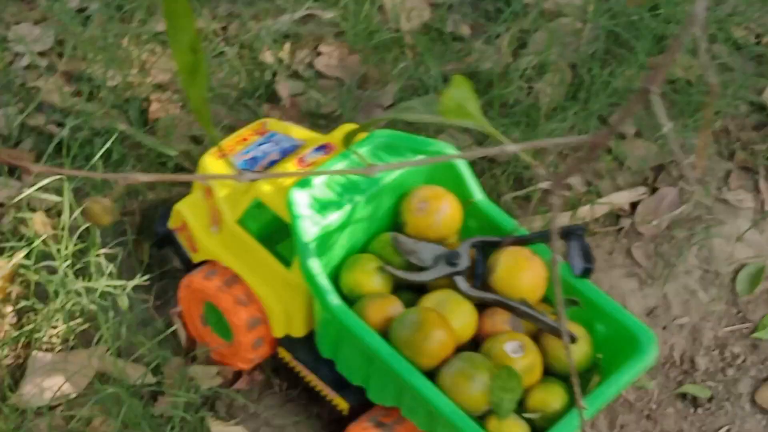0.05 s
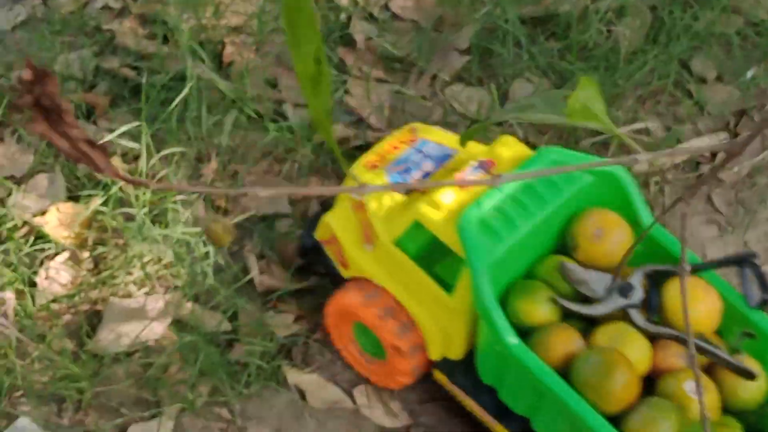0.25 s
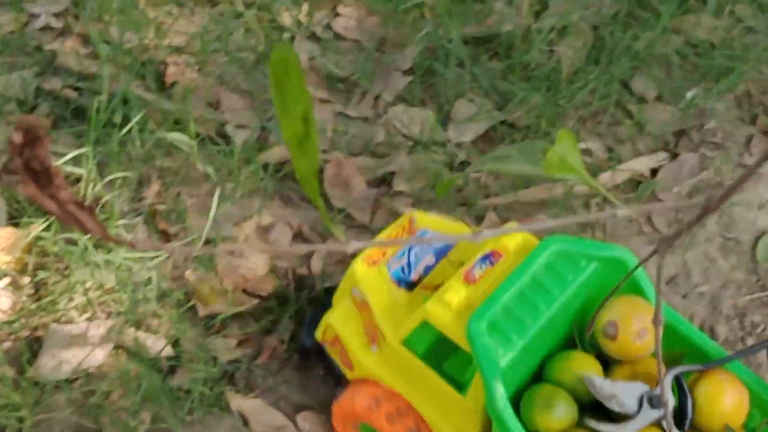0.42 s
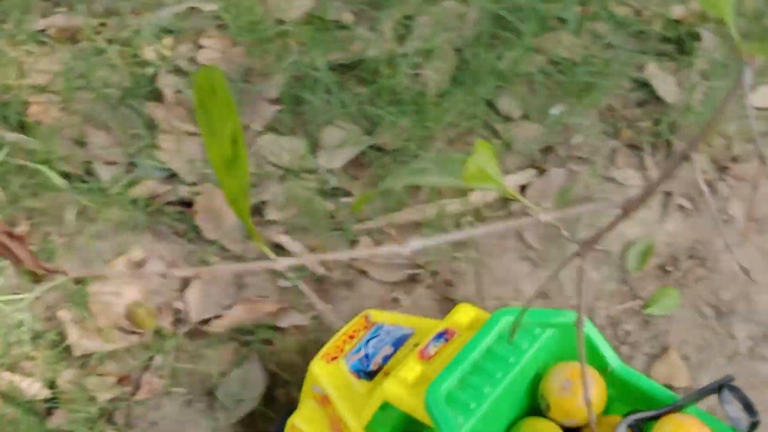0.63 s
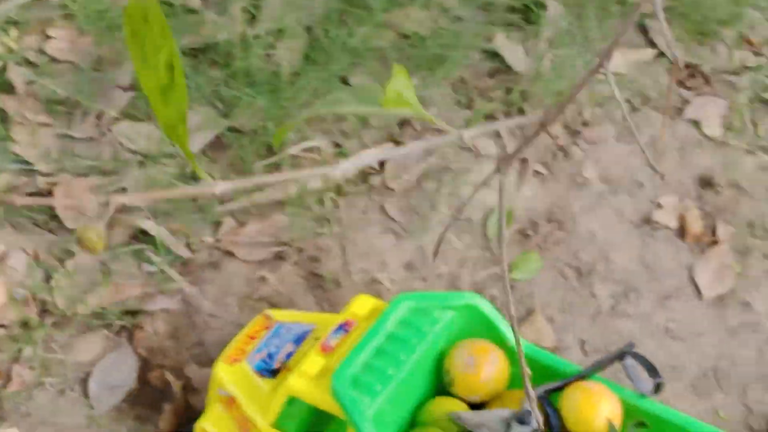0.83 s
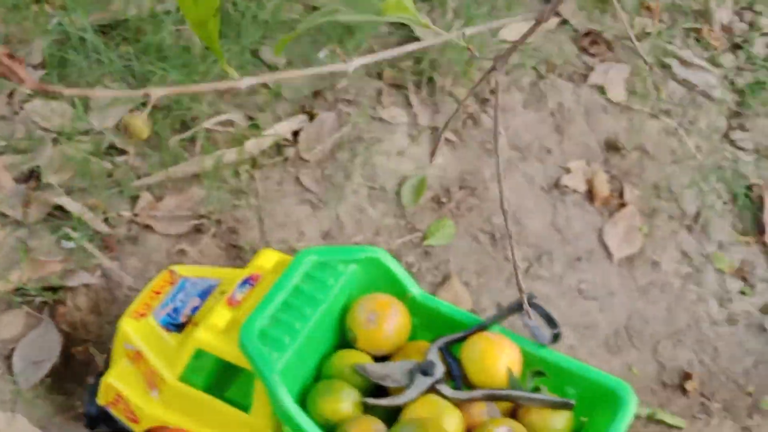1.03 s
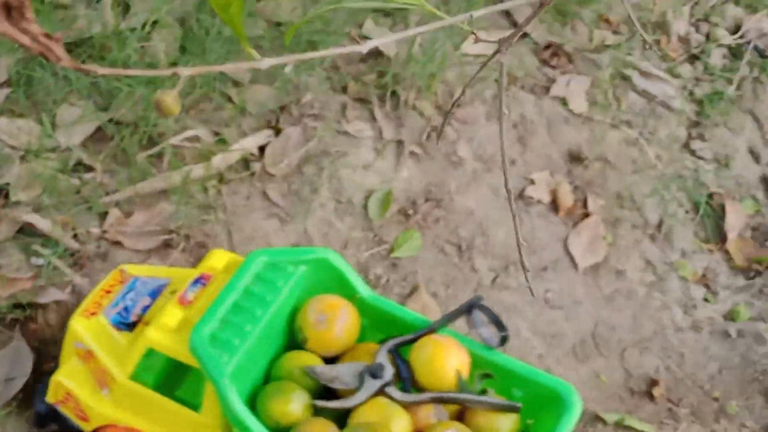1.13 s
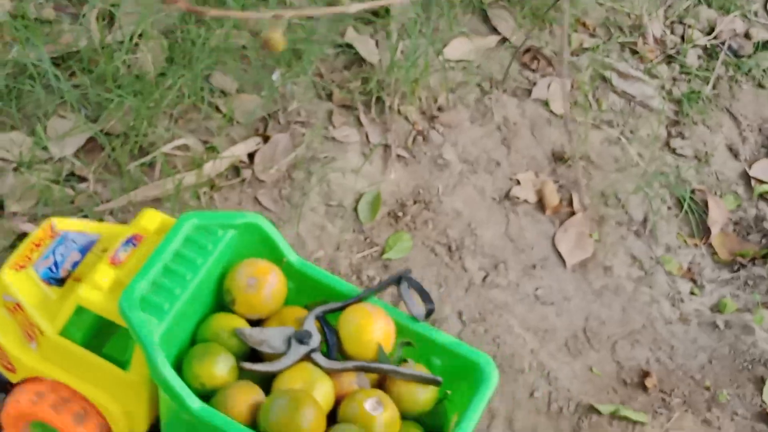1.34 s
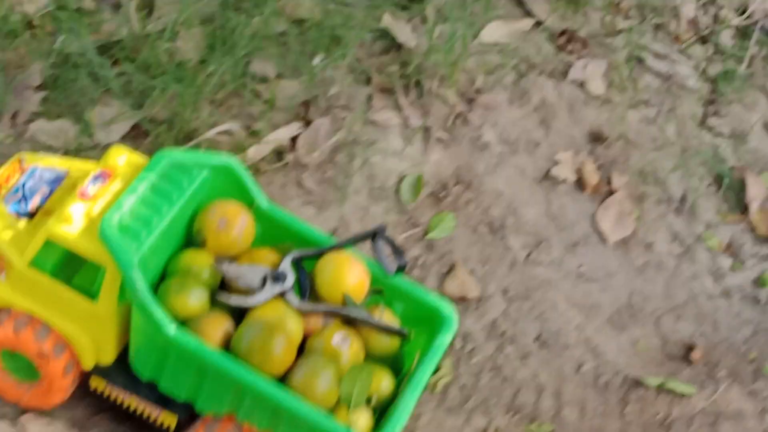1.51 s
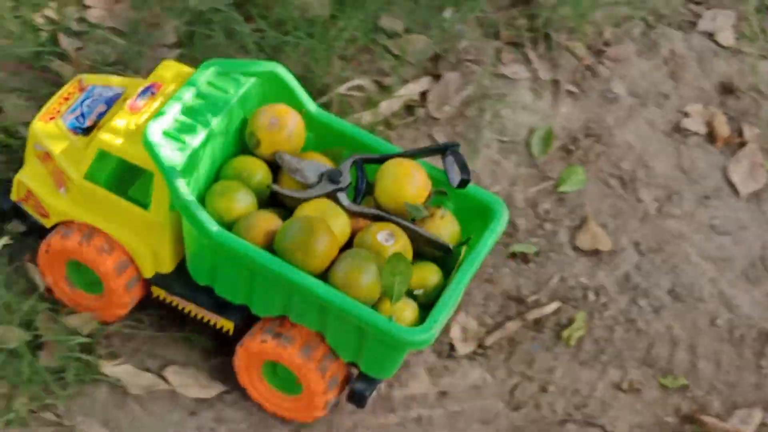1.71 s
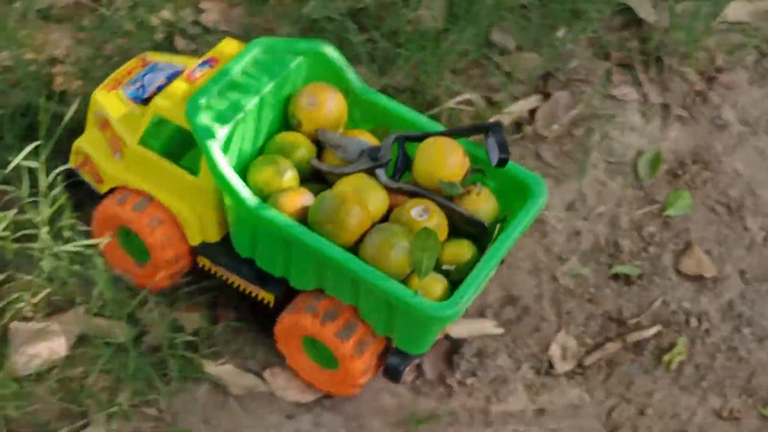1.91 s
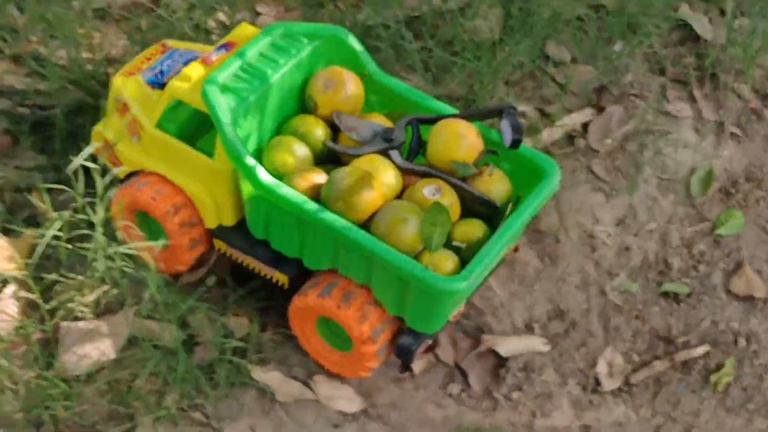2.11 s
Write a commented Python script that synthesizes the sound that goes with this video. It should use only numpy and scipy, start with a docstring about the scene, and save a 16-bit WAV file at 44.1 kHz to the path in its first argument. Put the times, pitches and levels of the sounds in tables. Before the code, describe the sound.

Close to the microphone, a loaded plastic toy truck rolls in two spurts, rumbling, clattering and snapping dry leaves. A faint bird calls far off among trees, at the start and during the lull.

```python
"""On bumpy dirt among trees, a hollow plastic toy truck is pulled along in two spurts.
It carries fruit and a pair of shears: impacts excite the damped modes of its body, and the load rattles.
The wheels rumble and crush dry leaves and grit, many small random impulses merging into noise.
Distant birds call in harmonic tones, scattered by the trees, over a low outdoor hum."""
import sys
import numpy as np
from scipy import signal
from scipy.fft import rfft, irfft, next_fast_len
from scipy.io import wavfile
from scipy.ndimage import map_coordinates

SR = 44100
rng = np.random.default_rng(int(sys.argv[2]) if len(sys.argv) > 2 else 0)


def persist_wave(psi):
    """Save psi, clipped to +-1, as 16-bit WAV."""
    counts = np.round(np.clip(psi, -1, 1) * 32767).astype(np.int16)
    wavfile.write(sys.argv[1], SR, np.atleast_2d(counts).T)


N = 94815


def amp(db):
    """Amplitude ratio of a level in decibels."""
    return 10 ** (np.asarray(db) / 20)


def unit(x):
    """Normalisation to rms 1."""
    return x / np.sqrt(np.mean(x ** 2) + 1e-20)


def curve(rows, t):
    """Linear interpolation through rows of t/s, value."""
    return np.interp(t, *np.transpose(rows))


def wobble(rate):
    """Smooth random modulation: a spline with `rate` knots a second."""
    knots = rng.standard_normal(int(N * rate / SR) + 4)
    return map_coordinates(knots, [np.arange(N) * rate / SR])


def coloured(x, points):
    """Minimum-phase filtering with a response given as rows of f/Hz, gain/dB."""
    m = 2 * next_fast_len(N)
    hz, db = np.transpose(points)
    gain = amp(np.interp(np.log(np.fft.rfftfreq(m, 1 / SR) + 1), np.log(hz), db))
    cepstrum = irfft(np.log(gain))
    cepstrum[1:m // 2] *= 2  # folding onto positive time makes the filter causal
    cepstrum[m // 2 + 1:] = 0
    return irfft(rfft(x, m) * np.exp(rfft(cepstrum)))[:N]


def add(track, start, sound):
    """Superposition of a sound on a track, from `start` seconds on."""
    i = max(0, round(start * SR))
    track[i:i + len(sound)] += sound[:max(0, N - i)]


def grains(rate, spread_db, bed_db):
    """Shot noise of rms 1: about `rate` uneven impulses a second on a Gaussian bed of finer ones."""
    chance, size, sign = rng.random((3, N))
    strength = amp(spread_db * np.minimum(-np.log(1 - size), 4))
    ticks = (chance < rate / SR) * strength * np.sign(sign - .5)
    return unit(unit(ticks) + amp(bed_db) * rng.standard_normal(N))


def body_knocks():
    """Impact excitation: each contact rings the body's modes; its hardness sets each band's strength."""
    # knocks of body and load: t/s, then relative level/dB in six bands from thud to click
    impacts = [(0.1017, -62, -61, -64, -57, -54, -61), (0.2332, -57, -50, -52, -69, -47, -73),
               (0.2854, -43, -47, -41.5, -43, -51, -84), (0.345, -53, -40.5, -41, -55, -44.5, -54.5),
               (0.431, -50, -41, -37, -38, -47, -85), (0.445, -59, -54, -53, -45, -47.5, -69),
               (0.4685, -34, -40, -42, -37.5, -41.5, -54.5), (0.4781, -42, -44, -58, -43, -42, -48),
               (0.5271, -52, -57, -43, -42, -56, -69), (0.579, -39, -48, -45, -44.5, -44, -62),
               (0.6084, -39, -50, -38, -57, -49.5, -74), (0.6237, -55, -47, -37, -40, -38.5, -59),
               (0.6885, -26, -30.5, -41.5, -38, -45, -51), (0.777, -61, -61, -61, -74, -84, -67),
               (1.051, -57, -56, -85, -56.5, -83, -97), (1.121, -54.5, -51.5, -47.5, -69, -46, -56),
               (1.2291, -46, -78, -57.5, -50.5, -68, -85), (1.2887, -48.5, -56, -53, -49.5, -60.5, -84),
               (1.4353, -49, -46.5, -48.5, -43.5, -68, -80), (1.4406, -46, -51, -45.5, -67, -45, -58),
               (1.4671, -63, -54, -52, -49, -45.5, -39), (1.5246, -43, -43, -44.5, -49.5, -50, -71),
               (1.553, -42.5, -39, -47, -43.5, -31.5, -56), (1.5606, -36, -40, -63, -56, -60, -61),
               (1.5832, -62, -67, -45.5, -61, -53.5, -68), (1.649, -75, -42.5, -56, -53, -58, -79),
               (1.6708, -45.5, -47.5, -43, -49.5, -49.5, -74), (1.853, -45.5, -38, -33, -41.5, -30, -51)]
    # edges of those bands: f/Hz
    band_edges = [110, 580, 980, 1650, 2250, 5000, 9500]
    # modes of the plastic body: f/Hz, relative level/dB, T60/s
    body_modes = [(162.3, -10, .04), (352, 7, 0.047), (510, -7, 0.06), (691, -5.5, .028),
                  (1095, -9.5, 0.015), (1403, -3, 0.014), (1857, -2, 0.019), (2710, 4.5, 0.0069),
                  (3223, -4, 0.021), (3490, -3, 0.0097), (4100, -3, 0.0076), (4790, -5.5, 0.0052),
                  (5650, -6.5, 0.012), (6260, -4.5, 0.022)]
    crack_t60_s, buzz_t60_s, energy_span_s = .008, .08, .01
    out, t = np.zeros(N), np.arange(SR // 8) / SR
    hz, mode_db, t60 = np.transpose(body_modes)[:, :, None]
    bands = [signal.butter(4, edges, 'band', fs=SR, output='sos')
             for edges in zip(band_edges, band_edges[1:])]
    polarity = np.cos(np.pi * np.arange(len(body_modes)))[:, None]
    for start, *levels in impacts:
        detune, strength = rng.standard_normal((2, len(body_modes), 1))
        decay = amp(mode_db + 2 * strength - 60 * t / t60)
        ring = (polarity * decay * np.sin(2 * np.pi * hz * (1 + .015 * detune) * t)).sum(0)
        crack = amp(5 - 60 * t / crack_t60_s)
        buzz = amp(-6 - 60 * t / buzz_t60_s)  # loose parts shake on after the knock
        knock = ring + (crack + buzz) * rng.standard_normal(len(t))
        for band, db in zip(bands, levels):
            part = signal.sosfilt(band, knock)
            add(out, start, amp(db - 1) * part * np.sqrt(energy_span_s * SR) / np.linalg.norm(part))
    return out


def rolling():
    """Filtered shot noise: wheels drum over clods, the load rattles, leaves and grit crunch in clumps."""
    # the truck's progress: t/s, then relative level/dB of rumble, rattle and crunch
    motion = [(0, -50.5, -56.5, -53), (0.064, -65.5, -70, -57.5), (0.126, -56.5, -53, -58),
              (0.24, -54.5, -57, -56.5), (0.4, -47.5, -49.5, -58.5), (0.49, -48, -48, -53),
              (0.633, -44.5, -50, -53), (0.68, -59, -62, -61), (0.794, -55.5, -64, -67.5),
              (0.891, -66, -74, -69.5), (1.0, -68.5, -65, -84.5), (1.119, -60.5, -71, -67),
              (1.28, -63, -60.5, -66), (1.393, -58, -65.5, -65.5), (1.464, -49.5, -49, -50.5),
              (1.504, -61, -61.5, -65.5), (1.566, -49, -46, -56), (1.62, -59, -62, -59.5),
              (1.67, -56, -56.5, -56), (1.729, -60.5, -70, -59), (1.83, -74.5, -67.5, -56),
              (1.887, -58.5, -62, -51.5), (1.98, -70.5, -64, -60), (2.05, -77.5, -78, -70.5),
              (2.15, -76, -71, -64.5)]
    # spectra of the wheels, the load and the crushed litter: f/Hz, relative level/dB
    rumble_spectrum = [(60, -33.5), (140, 0.5), (225, -9), (285, -1.5), (330, 2), (410, -1.5), (540, 0),
                       (750, -13), (1100, -19.5), (2500, -45.5)]
    rattle_spectrum = [(300, -28.5), (750, -3), (1100, -1), (1600, 0.5), (2400, -1.5), (3300, -9),
                       (5000, -23.5), (9000, -47.5)]
    crunch_spectrum = [(800, -33), (2500, -9), (3800, -3), (5300, -3.5), (7500, -6), (9500, -13),
                       (15000, -33)]
    times, *levels = np.transpose(motion)
    rumble_db, rattle_db, crunch_db = [np.interp(np.arange(N) / SR, times, db) for db in levels]
    rumble = unit(coloured(grains(rate=150, spread_db=4.5, bed_db=-4.0), rumble_spectrum))
    rattle = unit(coloured(grains(rate=300, spread_db=8.5, bed_db=2.5), rattle_spectrum))
    crunch = unit(coloured(grains(rate=570, spread_db=-1.5, bed_db=-3), crunch_spectrum))
    clumps_db = 2.2 * wobble(rate=80)
    return amp(rumble_db + 3) * rumble + amp(rattle_db) * rattle + amp(crunch_db - 1 + clumps_db) * crunch


def leaf_snaps():
    """Brittle fracture: a dry leaf or twig gives way in a brief, bright burst of noise."""
    # fractures: t/s, relative level/dB
    fractures = [(0.137, -41), (0.248, -37), (0.5576, -31), (0.57, -32), (0.64, -42), (0.9448, -46),
                 (1.428, -38), (1.5948, -39), (1.7856, -39.5), (1.814, -36.5), (1.8812, -36), (1.8863, -34),
                 (1.9056, -31.5), (1.991, -40), (2.06, -47)]
    # spectrum of a snap: f/Hz, gain/dB
    snap_spectrum = [(800, -24.5), (5300, 4), (8000, -3), (10500, -5), (15000, -32)]
    rise_s, t60_s = .001, .0087
    out, t = np.zeros(N), np.arange(SR // 40) / SR
    for start, db in fractures:
        envelope = (1 - np.exp(-t / rise_s)) * amp(db + 6.5 - 60 * t / t60_s)
        add(out, start, envelope * rng.standard_normal(len(t)))
    return coloured(out, snap_spectrum)


def bird_calls():
    """A harmonic series on an arched pitch, made slightly hoarse by random frequency modulation."""
    # calls: t/s, f/Hz near the top of the arch, relative level/dB
    calls = [(.122, 1101, -52.5), (1.002, 1077, -55), (1.2, 1256, -61)]
    # pitch contour of a call: t/s, ratio to that frequency
    arch = [(0, .67), (.04, 0.85), (.085, 0.99), (.155, 0.91), (.23, .84), (.35, 0.78)]
    # envelope of a call: t/s, relative level/dB
    swell = [(0, -23.5), (.04, -13), (.08, -2.5), (.16, -2), (.27, -11), (.37, -16.5)]
    # harmonics 1 to 6, the second strongest: relative level/dB
    harmonics = [-8.5, 4.5, -16, -34, -17.5, -19]
    out, t = np.zeros(N), np.arange(int(swell[-1][0] * SR)) / SR
    for start, top_hz, db in calls:
        jitter = 1 + .045 * wobble(rate=300)[:len(t)]
        pitch = top_hz * curve(arch, t) * jitter
        phase = 2 * np.pi * np.cumsum(pitch) / SR
        tone = sum(amp(level) * np.sin(k * phase) for k, level in enumerate(harmonics, 1))
        add(out, start, np.sqrt(2) * amp(db + curve(swell, t)) * tone)
    return out


def among_trees(direct, t60_s=.25, tail_db=-1):
    """Multiple scattering: the trees add an exponentially decaying diffuse tail to the direct sound."""
    t = np.arange(SR // 2) / SR
    tail = rng.standard_normal(len(t)) * amp(-60 * t / t60_s)
    return direct + amp(tail_db) * signal.fftconvolve(direct, tail / np.linalg.norm(tail))[:N]


def outdoor_hum():
    """Ambient noise, strongest in the bass, with two faint tones modulated in amplitude and phase."""
    # hums: f/Hz, level/dB, onset t/s
    hums = [(121.9, -80.5, 0.097), (350, -64, 1.962)]
    # spectrum of the ambient noise: f/Hz, relative level/dB
    air_spectrum = [(25, -33), (80, -4.5), (125, 4.5), (210, -12), (500, -23), (900, -31), (6500, -34.5),
                    (9000, -48), (15000, -71.5)]
    out, t = np.zeros(N), np.arange(N) / SR
    for hz, db, start in hums:
        envelope = amp(db + 2.3 * wobble(rate=10)) * np.clip(20 * (t - start), 0, 1)
        out += envelope * np.sin(2 * np.pi * hz * t + wobble(rate=14))
    return out + amp(-60) * unit(coloured(rng.standard_normal(N), air_spectrum))


def scene():
    """Superposition of the nearby truck, the distant birds and the background, in one channel."""
    return (body_knocks() + rolling() + leaf_snaps() + among_trees(bird_calls()) + outdoor_hum())[None]


def record(dry):
    """Linear filtering: a small microphone dulls the top treble and limits the bandwidth."""
    # microphone response: f/Hz, gain/dB
    response = [(7000, -1), (8200, -12), (10000, -21), (15500, -15)]
    cutoff_hz = 15700
    m = 2 * next_fast_len(N)
    passband = np.fft.rfftfreq(m, 1 / SR) < cutoff_hz
    return irfft(rfft(coloured(dry[0], response), m) * passband)[None, :N]


dry = scene()
out = record(dry)
persist_wave(out)
```